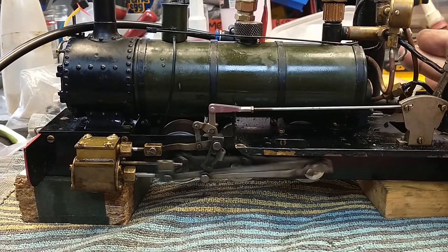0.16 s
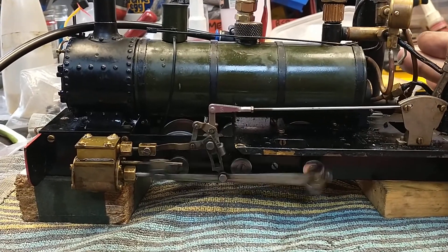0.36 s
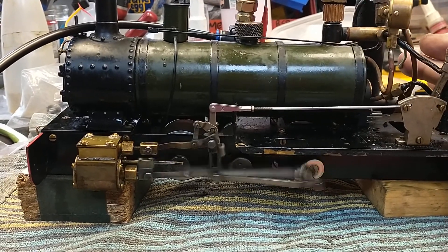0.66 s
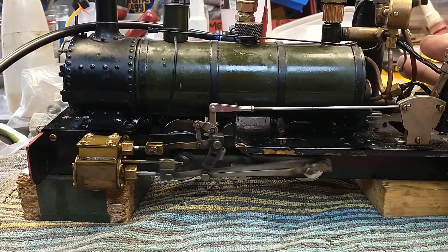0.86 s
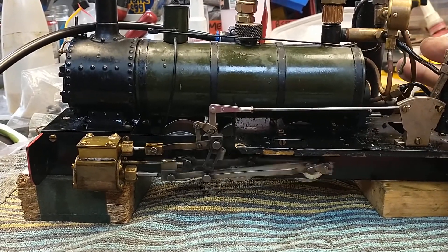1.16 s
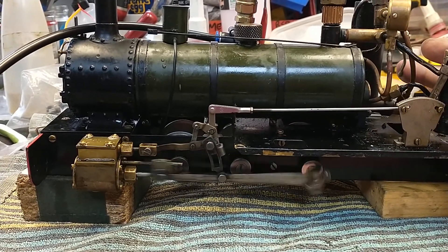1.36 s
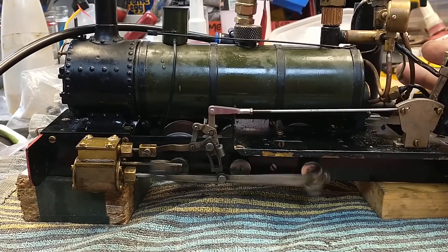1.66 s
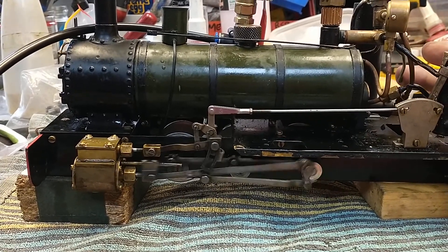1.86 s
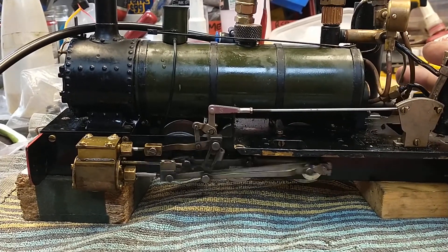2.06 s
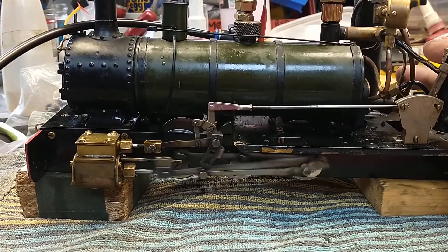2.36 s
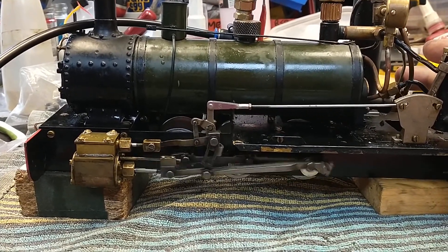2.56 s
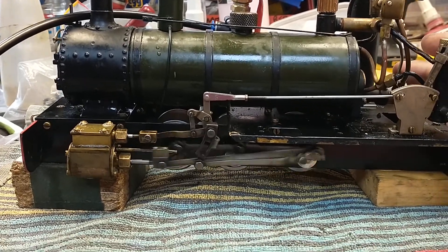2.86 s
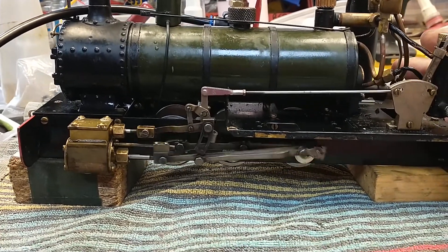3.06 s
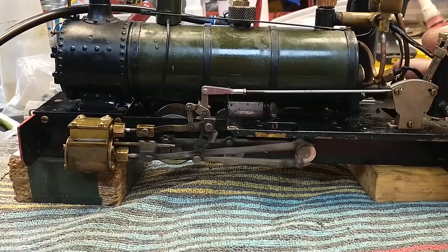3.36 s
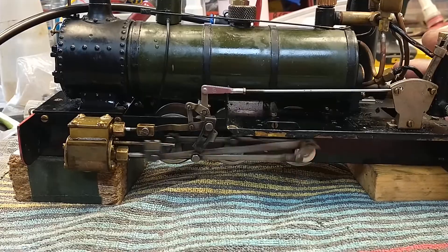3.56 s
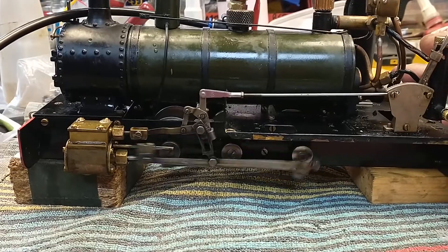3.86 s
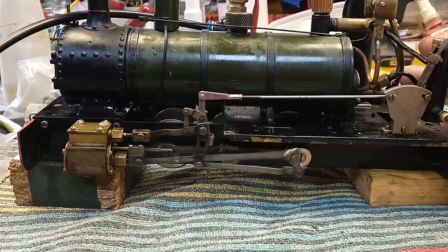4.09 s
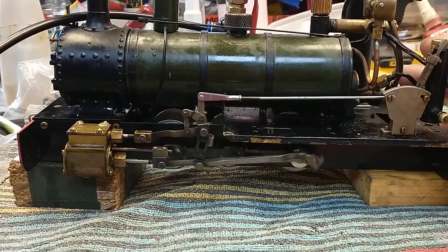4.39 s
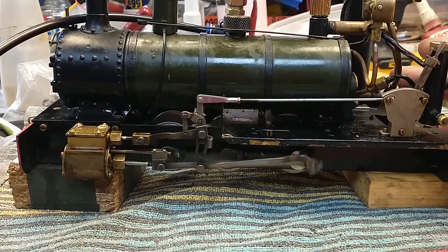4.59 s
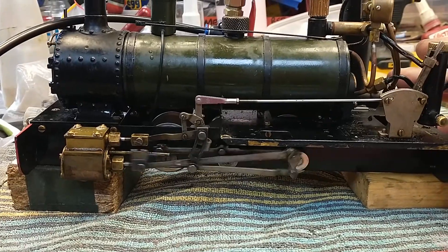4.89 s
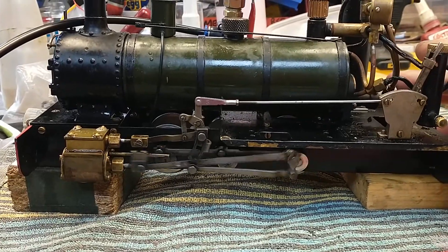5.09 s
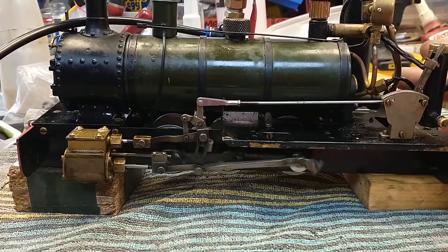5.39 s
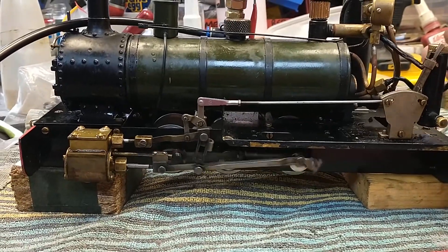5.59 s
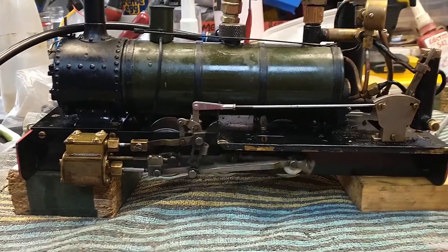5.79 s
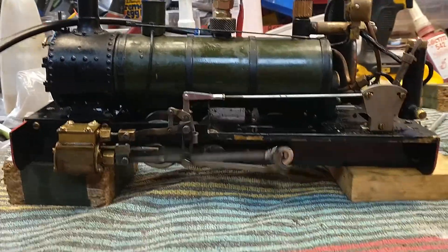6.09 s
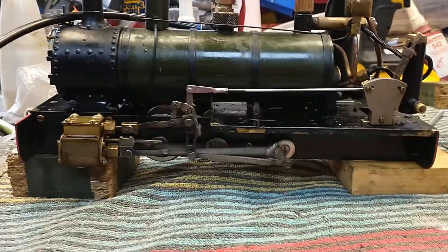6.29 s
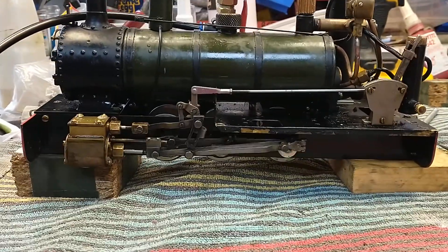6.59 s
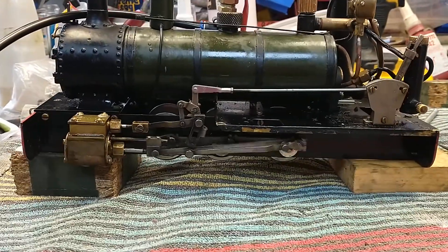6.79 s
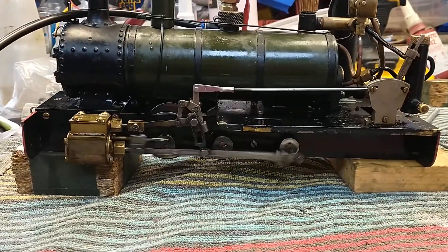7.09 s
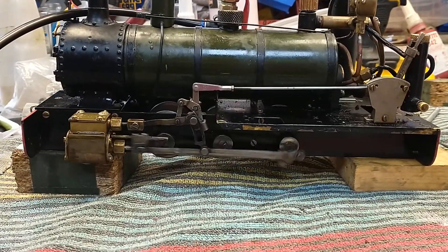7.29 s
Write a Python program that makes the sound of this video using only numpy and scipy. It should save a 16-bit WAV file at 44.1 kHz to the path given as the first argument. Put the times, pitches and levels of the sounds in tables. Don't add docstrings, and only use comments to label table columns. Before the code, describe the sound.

Close up in a small workshop, a model steam engine runs on compressed air with its wheels free. Rapid hissing puffs, several each turn, blend with crisp ticks and hard clacking of slack metal rods. It starts loud and fast, then the hiss thins and the rhythm slows, still running at the end. Stereo handheld phone, brief room echo, faint low bench murmur.

```python
import sys
import numpy as np
from scipy import signal
from scipy.fft import rfft, irfft, next_fast_len
from scipy.io import wavfile

SR = 44100
rng = np.random.default_rng(int(sys.argv[2]) if len(sys.argv) > 2 else 0)


def decibels_to_gain(level_db):
    exponent = np.asarray(level_db, float) / 20
    return 10 ** exponent


def file_out(sig):
    cols = np.atleast_2d(sig).T
    lim = np.clip(cols, -1, 1)
    pcm = np.round(lim * 32767).astype(np.int16)
    wavfile.write(sys.argv[1], SR, pcm)


N = 328545

# t/s, turns completed
WHEEL = [(0.023, 0), (0.5705, 4), (0.8512, 6), (1.4291, 10), (1.8764, 13), (2.1848, 15), (2.4996, 17),
         (2.8276, 19), (3.1659, 21), (3.5207, 23), (3.7059, 24), (4.0914, 26), (4.2896, 27), (5.0616, 31),
         (5.6848, 34), (5.8848, 35), (6.71, 39), (7.3218, 42)]
# t/s, hiss level/dB, running rattle level/dB
SUPPLY = [
    (0.0, -26.5, -35.5),
    (1.22, -28.5, -35),
    (3.71, -35.5, -39),
    (6.62, -36.5, -41),
    (7.45, -37.5, -41.5),
]

PORTS = [
    (0.008, 0.02),
    (0.155, 0.035),
    (0.345, 0.07),
    (0.51, 0.04),
    (0.705, 0.03),
    (0.78, 0.045),
]
# pipe level/dB at top speed, pipe level/dB at low speed, free jet level/dB
PUFFS = [
    (5, 4, 15),
    (7.5, 8.1, 16.5),
    (9, 11.4, 18),
    (11, 10.3, 6),
    (11.5, 7.4, 9),
    (4, 10, 14.5),
]
PIPE_HZ = [3140, 3820, 4200, 5420, 5900, 6440, 6915, 7282, 7690, 8230, 8397]
PIPE_HZ_TOP = [8690, 9090, 9395, 9665, 10780, 12200, 13620, 14085, 14900, 15250]
# width/Hz, left level/dB, right level/dB, extra level/dB at top speed
PIPES = [(51, -11, -9.5, 9.5), (74, -31, -16, 9.5), (85.5, -29.5, -27.5, 19), (207, -41, -34.5, 22.5),
         (84.5, -19, -18, 10.5), (49.7, -30, -11.5, 10), (141, -9, -16.5, 7.5), (50, -35, -25, 16),
         (201, -5.5, -36, 6.5), (126, 3, -19, 0), (67.5, 1.5, -13, 5.5), (137, -3, -7, 4),
         (175, -2.5, -32, 5), (98, 0.5, -21, 1.5), (86, -2, -23, 3.5), (200, -9, -27, -10),
         (250, -15, -35, 3), (400, -15, -30, 7), (100, -23, -21, -4), (250, -33, -16, 7.5),
         (150, -30, -27, 0)]
CHEST_HZ = [2600, 4480, 4710, 5020, 5200, 5750, 6085, 6560]
# width/Hz, left level/dB, right level/dB, extra level/dB at top speed
CHESTS = [(70, -43, -30.5, 11), (70, -28, -38, 14), (70, -34, -42, 18), (70, -34, -29, 19),
          (60, -49, -39, 12), (60, -25, -28, 17), (70, -22, -31, 14), (60, -24, -18, 12)]
# f/Hz, left level/dB, right level/dB
JET = [(2780, -19, -19.5), (3630, -22, -22.5), (5000, -51, -31.5), (6520, -17, -17.5), (8600, -9.5, -18.5),
       (9650, -8.5, -36), (9900, -13, -15), (13000, -20.5, -24.5), (16300, -20, -24)]
# f/Hz, width/Hz
NOTCHES = [(2900, 260), (5640, 90), (6210, 110)]

TICKS_AT = [(0.004, 0.008), (0.16, 0.175), (0.345, 0.338), (0.378, 0.382), (0.43, 0.432), (0.525, 0.512),
            (0.697, 0.69), (0.795, 0.778), (0.835, 0.82)]
# level/dB over the hiss at top speed, at low speed, scatter/dB, extra free jet level/dB
TICKS = [(5, 11.7, 9, 5.5), (-12, 4, -1, 3), (7, 11, -1, -3.5), (2, 7, -17, -9), (0, 17, 11, -16),
         (-7, 9, 1, -26), (12, 3, 6, 6), (6, 47, -5, -0.5), (6, 10.3, 0.5, 16.5)]
# t/s, peak level/dB
SNAPS = [(0.0333, -2.5), (0.0702, -6), (0.0962, -19), (0.1176, -6), (0.2099, -6.5), (0.234, -23),
         (0.3415, -10), (0.3696, -13), (0.4548, 0), (0.4843, -10), (0.5, -19), (0.5935, -19), (0.614, -14),
         (0.6424, -10), (0.7098, -19), (0.7577, -15), (0.849, -22), (0.8999, -24), (0.9961, -7),
         (1.0173, -3), (1.044, -9), (1.071, -11), (1.1937, -17), (1.2558, 2), (1.284, -4.5), (1.3061, -15),
         (1.3354, -22), (1.483, -13), (1.5325, -12), (1.5467, -1.5), (1.63, -14), (1.696, -4),
         (1.7809, -16), (1.807, -5), (1.932, 0), (1.995, -4), (2.0298, -11), (2.3437, -11), (2.5236, -4),
         (2.5536, -10.5), (2.6647, -11), (2.8865, -8), (2.9607, -3.5), (2.9966, -23), (3.1286, -7),
         (3.1956, -14), (3.285, -13), (3.3014, -6), (3.3443, -14), (3.481, -6)]
SNAPS_SLOW = [(3.6652, -11), (3.853, -10), (3.903, -17), (4.0314, -29), (4.049, -11), (4.1561, -19),
              (4.1925, -18), (4.243, -16), (4.3606, -17), (4.4389, -8), (4.4833, -18), (4.5543, -22),
              (4.6263, -18), (4.633, -12), (4.6788, -9), (4.827, -6.5), (4.9353, -25), (5.0207, -11),
              (5.064, -16.5), (5.1408, -17), (5.2187, -11), (5.3504, -9), (5.422, -14), (5.4344, -5),
              (5.543, -14), (5.6267, -30), (5.6407, -19), (5.6851, -17), (5.8422, -10), (5.9635, -28),
              (6.0478, -7), (6.0935, -21), (6.163, -17), (6.2523, -8), (6.4565, -7), (6.503, -17),
              (6.6539, -32), (6.666, -14), (6.71, -17), (6.7758, -13), (6.8677, -9.5), (6.9148, -15),
              (6.983, -13), (7.051, -16), (7.0736, -11), (7.1193, -25), (7.1817, -24), (7.275, -14),
              (7.3219, -20), (7.3995, -11.5)]

KNOCKS_AT = [(0.008, 0.016), (0.158, 0.176), (0.37, 0.362), (0.405, 0.428), (0.58, 0.58), (0.7, 0.705),
             (0.775, 0.77), (0.85, 0.824)]
# level/dB over the rattle at top speed, at low speed, scatter/dB, extra crack level/dB
KNOCKS = [(19.2, 15, -1, 8.5), (17, 15, -1, 3), (9.5, 12, 1.5, -12), (7, 18.4, 0.5, 2.5),
          (3.5, 1.4, -5, 12.5), (20, 5, 5.5, 4), (11, 5.5, 4, 0), (13.5, 17.2, 2, 5.5)]
# t/s, peak level/dB, low frame mode level/dB against the peak
CATCHES = [(0.026, -14, -3), (0.045, -14, -10), (0.105, -22, -16), (0.121, -9, -14), (0.162, -11.5, -15),
           (0.184, -14.5, -8), (0.243, -28, -5), (0.259, -11.5, -13), (0.299, -13, -9), (0.319, -16.5, -8),
           (0.351, -17, -9), (0.381, -23, -10), (0.396, -7, -18), (0.435, -11.5, -22), (0.455, -11.5, -20),
           (0.488, -16.5, -12), (0.514, -27, -7), (0.531, -15, -8), (0.572, -14, -6), (0.628, -19.5, -16),
           (0.654, -27.5, -6), (0.671, -10, -11.5), (0.712, -11.5, -19), (0.733, -15, -12),
           (0.795, -25, -16), (0.809, -7, -19), (0.852, -15, -10), (0.875, -17.5, -16), (0.905, -21.5, -11),
           (0.955, -10, -14.5), (0.999, -15.5, -13), (1.018, -18, -14), (1.054, -21.5, -13),
           (1.096, -16.5, -13), (1.108, -11.5, -20), (1.142, -13, -19), (1.243, -9, -20), (1.285, -13, -16),
           (1.308, -13.5, -14), (1.387, -10.5, -15), (1.43, -13.5, -20), (1.519, -24, -20),
           (1.534, -16, -12), (1.546, -10, -20.5), (1.58, -17.5, -6), (1.604, -21.5, -4),
           (1.683, -17.5, -12), (1.73, -16, -14), (1.752, -19, -5.5), (1.832, -15.5, -14),
           (1.879, -13.5, -22), (1.902, -19, -21), (1.984, -11.5, -11), (2.032, -15, -10.5),
           (2.056, -16, -15), (2.088, -24.5, -11), (2.139, -16, -11), (2.162, -18.5, -14),
           (2.187, -19, -13), (2.212, -14, -19.5)]
CATCHES_MID = [(2.294, -13.5, -12), (2.344, -16, -13), (2.37, -14.5, -15), (2.437, -31, -8),
               (2.453, -17, -11), (2.478, -14.5, -10), (2.503, -16, -21), (2.527, -16, -19),
               (2.592, -24, -15), (2.615, -12, -9), (2.638, -15.5, -23), (2.664, -15, -10),
               (2.692, -13, -26), (2.732, -17.5, -15), (2.779, -15, -12.5), (2.804, -15.5, -17),
               (2.831, -14, -23), (2.857, -18, -14), (2.945, -19, -12), (2.958, -13, -14),
               (2.998, -19, -11), (3.029, -16, -23), (3.07, -20, -20), (3.114, -21, -10), (3.128, -12, -27),
               (3.17, -19, -13), (3.198, -16.5, -10), (3.291, -18, -15), (3.302, -15, -23),
               (3.345, -19, -9), (3.376, -17.5, -17), (3.419, -17.5, -19), (3.468, -19.5, -7.5),
               (3.492, -19.5, -5), (3.525, -19.5, -10.5), (3.556, -22, -10), (3.589, -28, -16),
               (3.601, -18.5, -17), (3.646, -26.5, -5), (3.712, -19.5, -16), (3.741, -22, -14),
               (3.774, -28, -13), (3.837, -30, 3), (3.903, -20, -10.5), (3.936, -25, -5.5),
               (3.969, -31, -7), (3.983, -24.5, -5), (4.032, -22, -6), (4.062, -20, -10), (4.098, -20, -18),
               (4.129, -20.5, -14), (4.162, -32, -10), (4.178, -22, -12.5), (4.224, -26.5, -8),
               (4.255, -20.5, -2.5), (4.29, -18.5, -16), (4.323, -25, -9), (4.362, -28.5, -9),
               (4.375, -22.5, -8), (4.486, -21, -8.5)]
CATCHES_SLOW = [(4.517, -21, -13), (4.55, -28.5, -13), (4.566, -23, -7), (4.616, -36, -6),
                (4.644, -26, -3.5), (4.679, -20, -8), (4.71, -22.5, -14), (4.748, -21, -21),
                (4.872, -18.5, -14), (4.903, -22, -11), (4.938, -26, -7), (4.952, -19, -14),
                (5.002, -29.5, -4), (5.031, -21, -5), (5.067, -19, -13), (5.101, -23, -8.5),
                (5.14, -22, -18), (5.232, -19, -10), (5.269, -23.5, -11), (5.31, -25, -9),
                (5.348, -29, -13), (5.362, -21, -12), (5.415, -35, -7), (5.442, -22.5, -12),
                (5.482, -20.5, -10), (5.517, -23, -13), (5.552, -28, -10), (5.567, -17, -17),
                (5.619, -27.5, -11), (5.688, -22, -9), (5.718, -25.5, -5), (5.771, -23.5, -9),
                (5.839, -30, -6), (5.892, -21, -22), (5.925, -23, -15), (5.961, -25, -23), (6.025, -31, -3),
                (6.057, -24, -3), (6.098, -21.5, -19), (6.13, -24, -17), (6.166, -31, -10),
                (6.235, -29.5, -6), (6.302, -22.5, -26), (6.333, -22.5, -15), (6.372, -27, -11),
                (6.468, -19, -10), (6.506, -22, -16), (6.577, -30, -14), (6.592, -18.5, -14),
                (6.713, -23, -21), (6.747, -22.5, -21), (6.784, -31, -13), (6.8, -19.5, -20),
                (6.867, -27, -9), (6.877, -20.5, -13), (6.918, -21, -15), (6.95, -21.5, -14),
                (7.071, -30.5, -8), (7.123, -24, -10.5), (7.153, -23, -25), (7.19, -27, -14),
                (7.286, -21, -9), (7.326, -20, -18), (7.361, -22, -18), (7.395, -33.5, -8),
                (7.409, -21.5, -12)]
# share of turn, rattle level/dB
LOAD = [(0, -2), (0.02, -8.5), (0.17, -1.5), (0.29, -5.5), (0.37, -3), (0.63, -7), (0.71, 1.5), (0.85, 3),
        (0.97, -5)]
# f/Hz, width/Hz, left level/dB, right level/dB, extra level/dB at top speed
FRAME = [(462.4, 34, -16.5, -20, -1.5), (601.4, 102, -14.5, -14, -1.5), (791.5, 124, -7, -12, -1),
         (1060, 340, -12.5, -26, -4.5), (1268, 232, -7, -12.5, -0.5), (1426, 127, -3, -10, 3),
         (1640, 170, -5, -8, -1.5), (1883, 107, -3, -12.5, -2.5), (2220, 198, -11, -20.5, -1.5),
         (2610, 31, -7.5, -11.5, -11), (3530, 79, -16.5, -45, 7), (344, 15, -25.5, -23, 0),
         (1504, 65, -13, -19.5, 8)]

# f/Hz, level/dB per Hz
HUM = [(15, -56), (25, -24), (43, -20), (108, -4.5), (343, -0.5), (394, -17), (452, 5), (500, 3.5),
       (650, -37), (1100, -120)]

FAST_S, SLOW_S = 0.14, 0.2


def turn_starts():
    s, turns = np.transpose(WHEEL)
    s = np.interp(np.arange(turns[-1] + 1), turns, s)
    s = np.r_[2 * s[0] - s[1], s, 2 * s[-1] - s[-2]]
    return s, np.clip((SLOW_S - np.diff(s)) / (SLOW_S - FAST_S), 0, 1)


def crank():
    s, speed = turn_starts()
    t = np.arange(N) / SR
    return np.interp(t, s, np.arange(len(s))) % 1, np.interp(t, s[1:], speed)


def exhaust(touches, spits, hiss_db, jet_db, swell_db, speed):
    jet_grain_db = 2.0
    gusts = drift(93)
    ticks = bursts(touches, 0.62, rise_s=0.0002, fall_s=0.00026)
    hiss = decibels_to_gain(hiss_db + 16.5 + 0.87 * gusts)
    air = port_noise(0.66, 6, grain_db=3.3) * (hiss + decibels_to_gain(16.5) * ticks)

    flow = decibels_to_gain(jet_db + 16.0 + 1.47 * speed + 1.4 * gusts)
    flow = flow + decibels_to_gain(6.0) * bursts(spits, 0.89, rise_s=0.0006, fall_s=0.0013)
    free = port_noise(0.066, 6, jet_grain_db) * flow
    cavity = port_noise(0.26, 5, jet_grain_db) * flow

    hz, left_db, right_db = np.transpose(JET)
    low_cut = signal.butter(2, 2200, "high", fs=SR, output="sos")
    jet = signal.sosfilt(low_cut, [shaped(free[0], hz, left_db), shaped(free[1], hz, right_db)])

    def blown(hz):
        return (air if hz < 10200 else cavity) * waver(hz)

    pipes = np.c_[np.r_[PIPE_HZ, PIPE_HZ_TOP, CHEST_HZ], PIPES + CHESTS]
    out = body(pipes, speed, blown, order=2) + jet
    top = signal.sosfiltfilt(signal.butter(4, 10500, "high", fs=SR, output="sos"), out)
    return out + top * (decibels_to_gain(0.8 * swell_db - 0.8) - 1)


def ports(share, speed):
    opens, lasts, fast_db, slow_db, jet_db = np.c_[PORTS, PUFFS].T[..., None]
    since = (share - opens + 0.5) % 1 - 0.5

    def gap(fall):
        opening = 1 + since / 0.04
        closing = 1 + (lasts - since) / fall
        return np.clip(np.minimum(opening, closing), 0, 1)

    puff_db = slow_db + speed * (fast_db - slow_db)
    pipe_db = -7.5 + (gap(0.1) * puff_db).max(axis=0)
    depth = 0.37 + speed * (0.22 - 0.37)
    return pipe_db, depth * (-9.5 + (gap(0.097) * jet_db).max(axis=0))


def waver(hz):
    knots = np.arange(0, N + SR, 0.04 * SR)
    db = np.interp(np.arange(N), knots, rng.standard_normal(len(knots)))
    return decibels_to_gain((1.5 if hz > 6600 else 2) * db - 0.8)


def motion(knocks, thuds, cracks, rattle_db, speed):
    rise_s, scatter_db = 0.0004, 2.8
    near = port_noise(0.93, 2, grain_db=1.5)
    apart = port_noise(0.9, 6, grain_db=1.5)
    running = decibels_to_gain(rattle_db + 18.5 + 5.7 * drift(90))
    tail = decibels_to_gain(6.5) * bursts(knocks, 0.33, rise_s, fall_s=0.0054)

    def struck(hz):
        hits = thuds if hz < LOW_MODES_HZ else knocks
        chatter = running + tail + decibels_to_gain(12) * bursts(hits, scatter_db, rise_s, fall_s=0.0056)
        push = bursts(hits, scatter_db, rise_s=0.00004, fall_s=0.000096)
        return (near if hz < 1200 else apart) * chatter + decibels_to_gain(25.5 - speed) * push

    frame = body(FRAME, speed, struck, order=1)
    frame = signal.sosfilt(signal.butter(2, 3800, fs=SR, output="sos"), frame)
    crack = port_noise(0.13, 7, grain_db=2.0) * decibels_to_gain(-11.5) * bursts(cracks, 0.75, rise_s=0.0006, fall_s=0.0092)
    crack_band = signal.butter(2, [2300, 4300], "band", fs=SR, output="sos")
    return frame + signal.sosfilt(crack_band, crack)


LOW_MODES_HZ = 1100


def looped(angles, strengths, level_db, strays):
    s, speed = turn_starts()
    share_fast, share_slow = np.transpose(angles)
    fast_db, slow_db, scatter_db, bright_db = np.transpose(strengths)
    speed = speed[:, None]
    luck = rng.uniform(-np.sqrt(3), np.sqrt(3), (len(speed), len(angles), 2))

    share = share_slow + speed * (share_fast - share_slow)
    at = s[:-1, None] + np.diff(s)[:, None] * share + 0.001 * luck[..., 0]
    db = slow_db + speed * (fast_db - slow_db) + scatter_db * luck[..., 1]
    db = db + np.interp(at * SR, np.arange(N), level_db)
    heard = (at > 0) & (at < N / SR)
    at, db, bright_db = at[heard], db[heard], (bright_db + 0 * db)[heard]

    same_s = 0.007
    apart = np.abs(at[:, None] - strays[:, 0])
    db = np.where(apart.min(axis=1) < same_s, -120, db)
    stray_bright_db = np.where(apart.min(axis=0) < same_s, bright_db[apart.argmin(axis=0)], 0)
    at, db = np.r_[at, strays[:, 0]], np.r_[db, strays[:, 1]]
    return np.c_[at, db], np.c_[at, db + np.r_[bright_db, stray_bright_db]]


def bursts(events, spread_db, rise_s, fall_s):
    s, db = np.transpose(events)
    marks = np.full(N, 1e-18)
    marks[(s * SR).astype(int).clip(0, N - 1)] = decibels_to_gain(db + spread_db * rng.standard_normal(len(s)))
    up, down = np.exp(-1 / (rise_s * SR)), np.exp(-1 / (fall_s * SR))
    return signal.lfilter([1 - up], np.convolve([1, -up], [1, -down]), marks)


def body(modes, speed, excite, order):
    out = np.zeros((2, N))
    for k, (hz, width_hz, left_db, right_db, fast_db) in enumerate(modes):
        ring = excite(hz)
        for _ in range(order):
            ring = resonate(ring, hz, width_hz * order ** 0.6)
        out += (-1) ** k * decibels_to_gain([[left_db], [right_db]]) * decibels_to_gain(fast_db * speed) * ring
    return out


def resonate(x, hz, width_hz):
    r = np.exp(-np.pi * width_hz / SR)
    poles = [1, -2 * r * np.cos(2 * np.pi * hz / SR), r * r]
    return signal.lfilter([(1 - r * r) / 2, 0, (r * r - 1) / 2], poles, x)


def cancelled(x, speed):
    for hz, width_hz in NOTCHES:
        x = x - 0.6 * np.sqrt(speed) * resonate(x, hz, width_hz)
    return x


def port_noise(alike, lag, grain_db):
    shared, own = rng.standard_normal((2, N)) * decibels_to_gain(grain_db * np.clip(drift(620), -3, 3))
    return np.array([np.roll(shared, lag), alike * shared + np.sqrt(1 - alike ** 2) * own])


def drift(rate_hz):
    r = np.exp(-2 * np.pi * rate_hz / SR)
    wander = signal.lfilter([1], [1, -2 * r, r * r], rng.standard_normal(N + 4000))
    return rms_one(wander[4000:])


def rms_one(x):
    return x / np.sqrt(np.mean(x ** 2) + 1e-20)


def shaped(x, hz, db):
    grid = np.log(np.fft.rfftfreq(N, 1 / SR) + 1)
    return irfft(rfft(x) * decibels_to_gain(np.interp(grid, np.log(hz), db)), N)


def shop(x):
    t60_s, wall_cut_hz = 0.21, 27000
    size = next_fast_len(N + SR)
    hz = np.fft.rfftfreq(size, 1 / SR)
    lags = rng.uniform(0.009, 0.035, (2, 6, 1))
    loops = decibels_to_gain(-60 * lags / t60_s) * np.exp(-2j * np.pi * hz * lags) / (1 + 1j * hz / wall_cut_hz)
    echoes = (loops / (1 - loops)).sum(axis=1)
    return irfft(rfft(x.mean(axis=0), size) * echoes, size)[:, :N]


def hum(speed):
    murmur = rms_one(shaped(port_noise(0.9, 0, grain_db=1.5), *np.transpose(HUM)))
    return decibels_to_gain(-59.5 + 4.5 * speed + 0.99 * drift(8.0)) * murmur


def scene():
    share, speed = crank()
    s, air_db, rattle_db = np.transpose(SUPPLY)
    t = np.arange(N) / SR
    air_db, rattle_db = np.interp(t, s, air_db), np.interp(t, s, rattle_db)

    snaps = np.r_[SNAPS, SNAPS_SLOW] + [-0.00032, -2]
    touches, spits = looped(TICKS_AT, TICKS, air_db, snaps)
    pipe_db, jet_db = ports(share, speed)
    swell_db = jet_db - jet_db.mean() + 5 * np.cos(2 * np.pi * (share - 0.56))
    engine = exhaust(touches, spits, air_db + pipe_db, air_db + jet_db, swell_db, speed)

    catches = np.r_[CATCHES, CATCHES_MID, CATCHES_SLOW]
    knocks, cracks = looped(KNOCKS_AT, KNOCKS, rattle_db, catches[:, :2] + [-0.0006, -1.5])
    thuds = knocks.copy()
    thuds[-len(catches):, 1] += 0.8 * (catches[:, 2] + 13)
    load_db = np.interp(share, *np.transpose(LOAD), period=1)
    engine = engine + motion(knocks, thuds, cracks, rattle_db + load_db, speed)

    engine = cancelled(engine, speed)
    return engine + decibels_to_gain(-21.0) * shop(engine) + hum(speed)


def roll_off(x):
    return signal.sosfilt(signal.butter(12, 16590, fs=SR, output="sos"), x)


def record(dry):
    top_cut = signal.ellip(12, 0.5, 70, 15780, fs=SR, output="sos")
    mix = signal.sosfilt(top_cut, np.tanh(dry))
    return roll_off(mix)


dry = scene()
out = record(dry)
file_out(out)
```